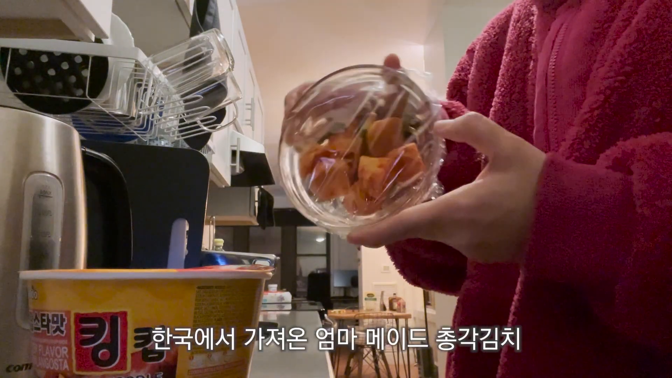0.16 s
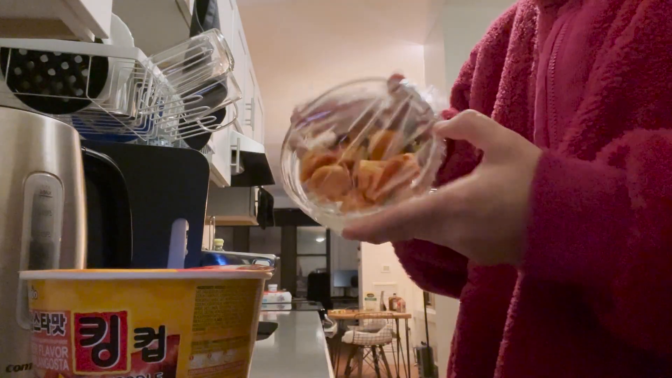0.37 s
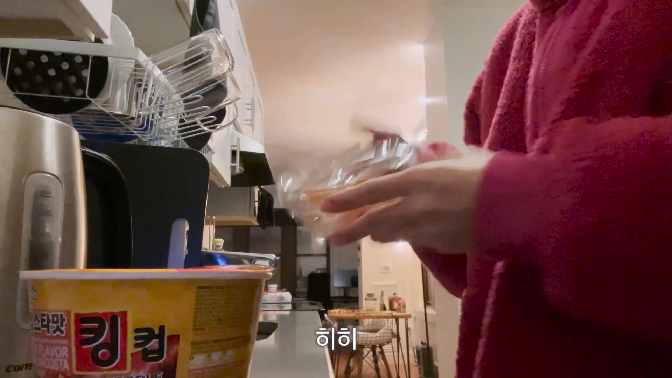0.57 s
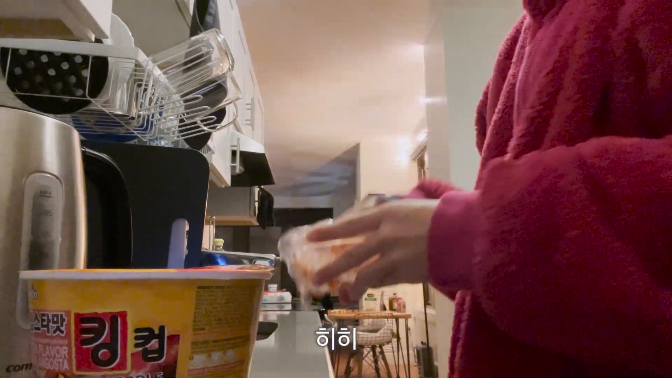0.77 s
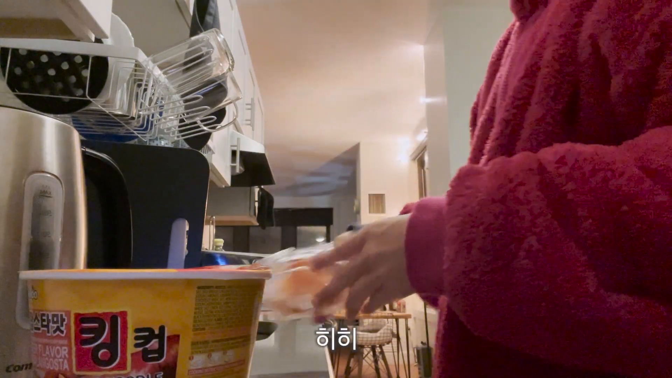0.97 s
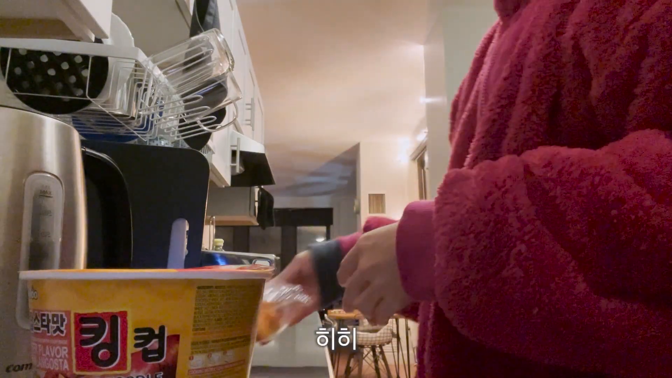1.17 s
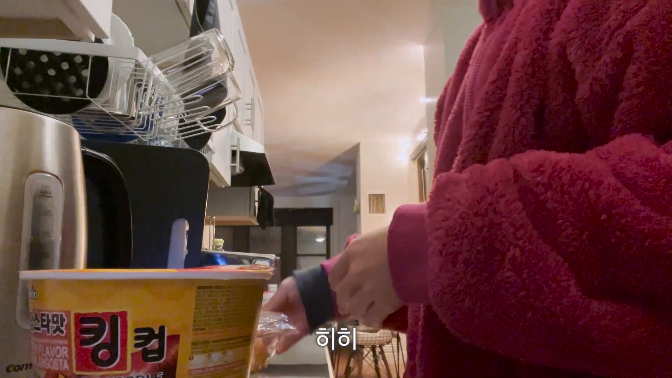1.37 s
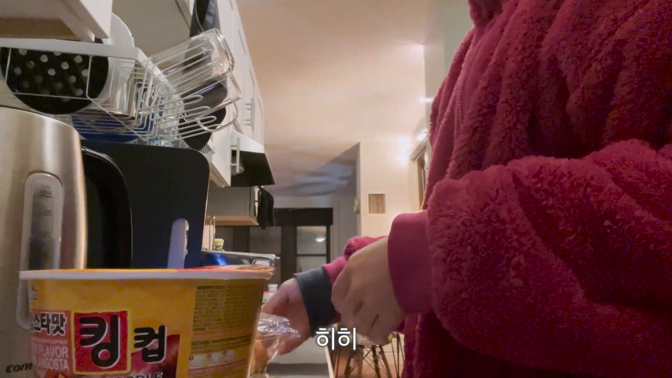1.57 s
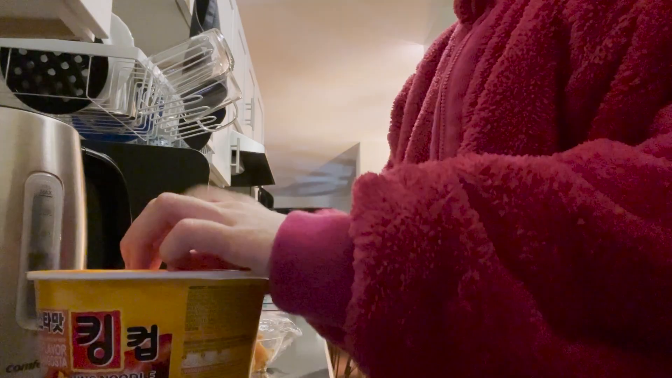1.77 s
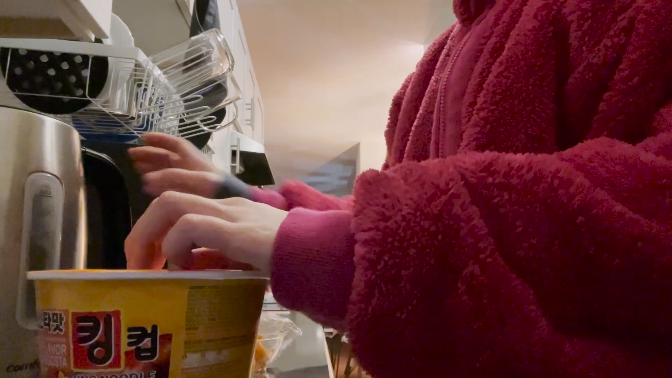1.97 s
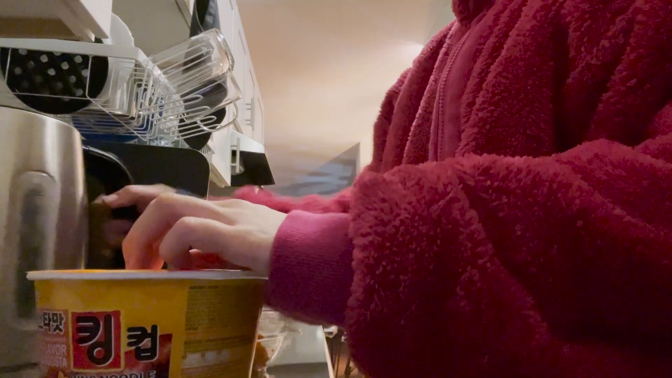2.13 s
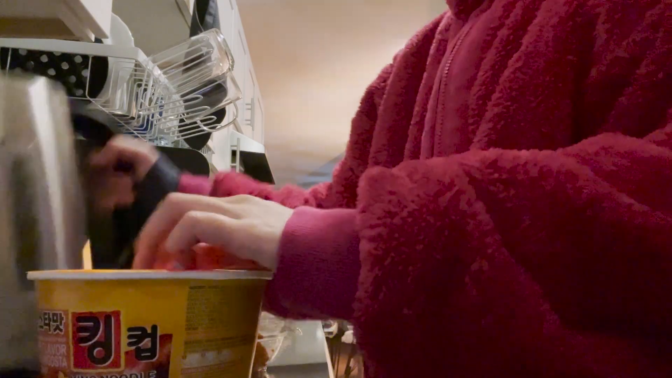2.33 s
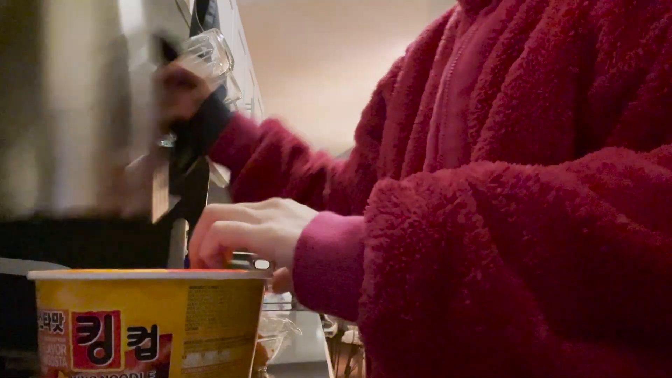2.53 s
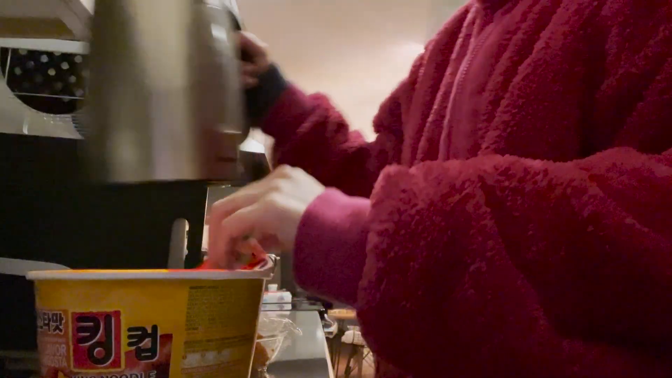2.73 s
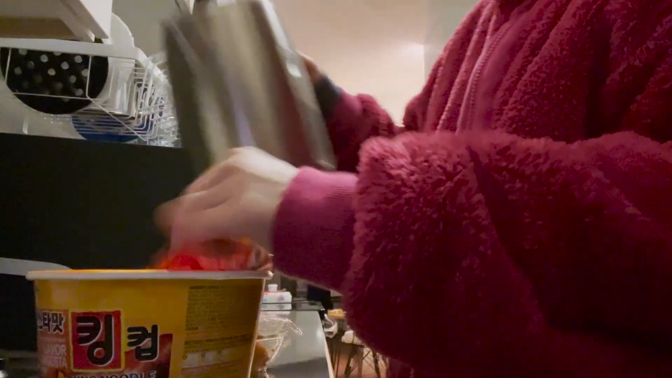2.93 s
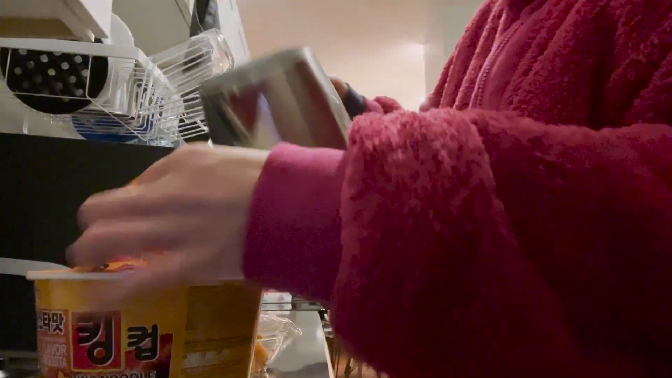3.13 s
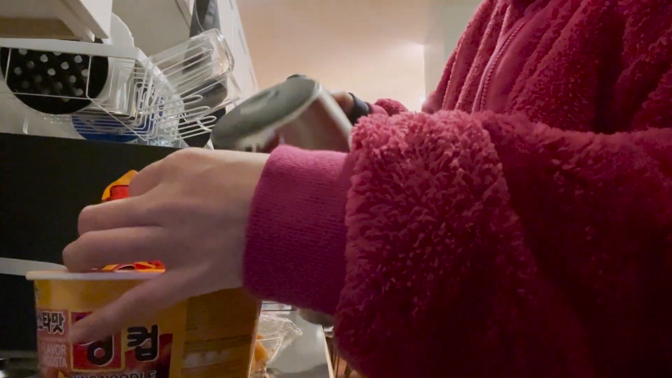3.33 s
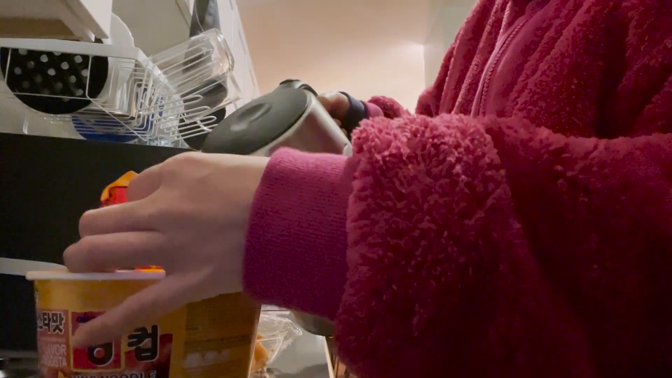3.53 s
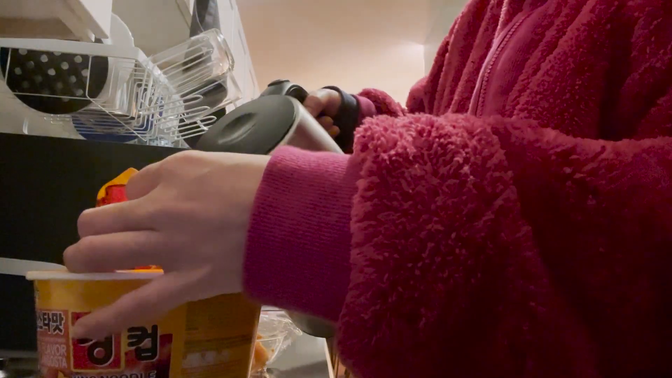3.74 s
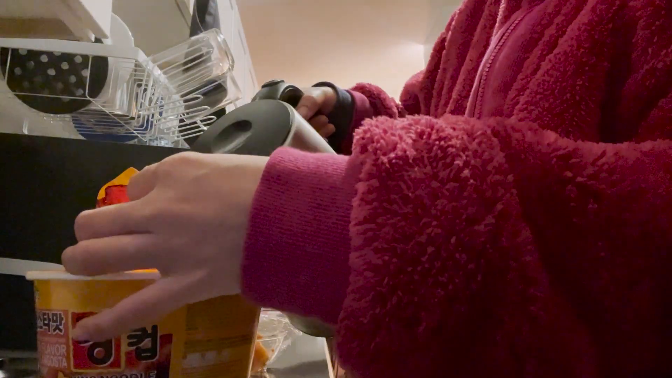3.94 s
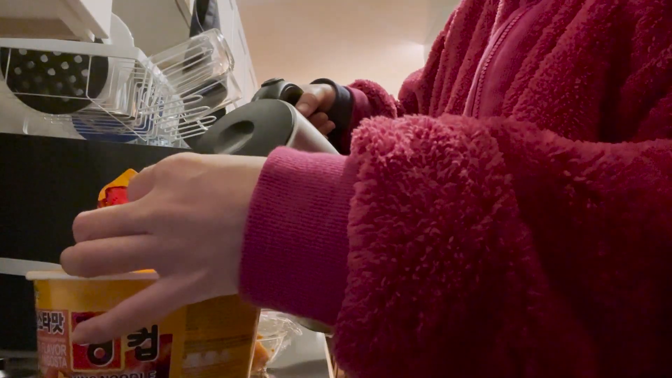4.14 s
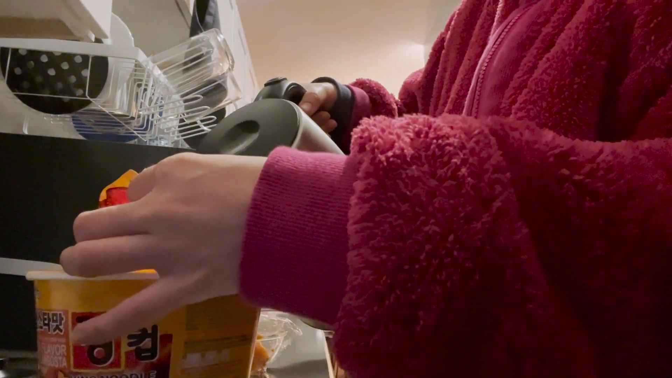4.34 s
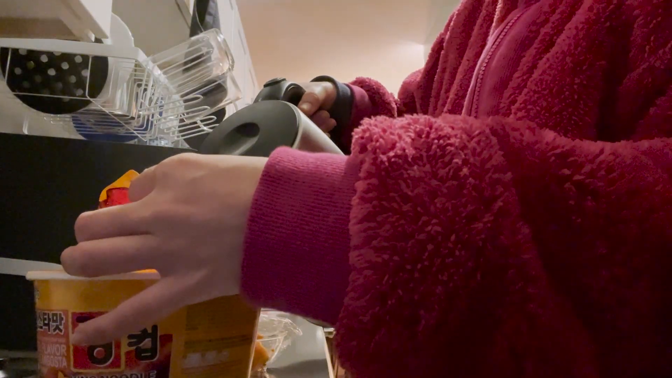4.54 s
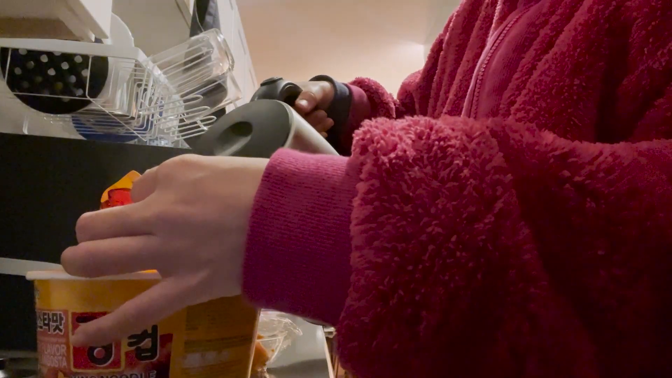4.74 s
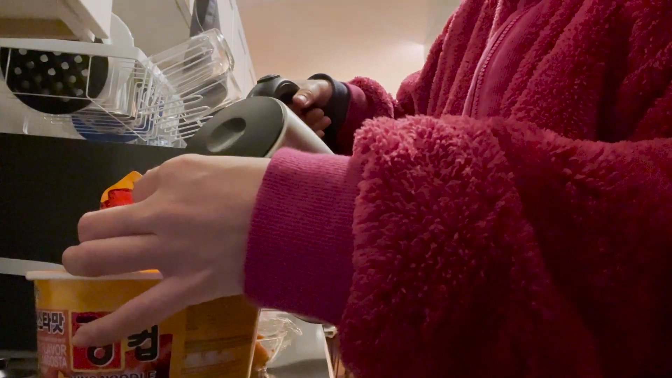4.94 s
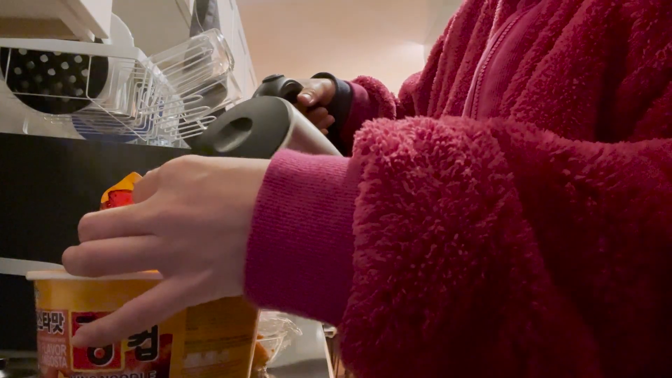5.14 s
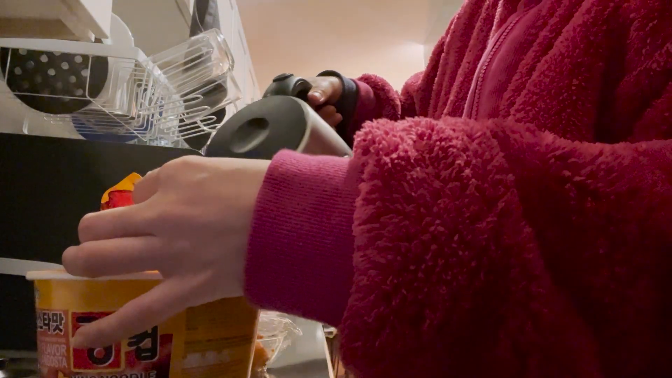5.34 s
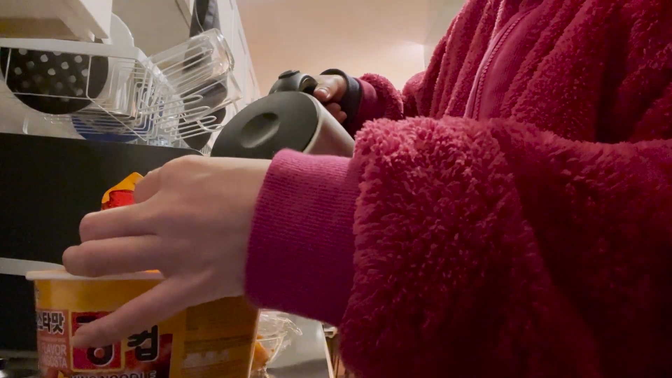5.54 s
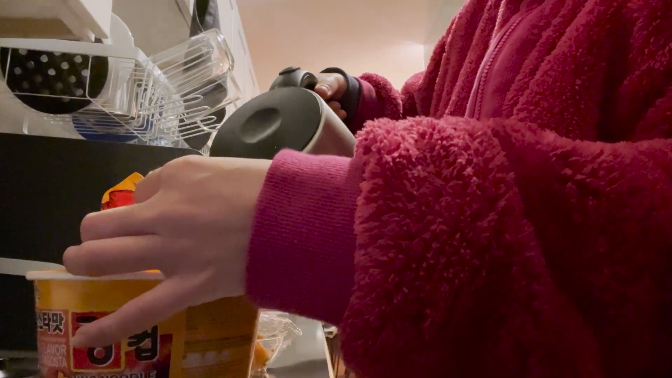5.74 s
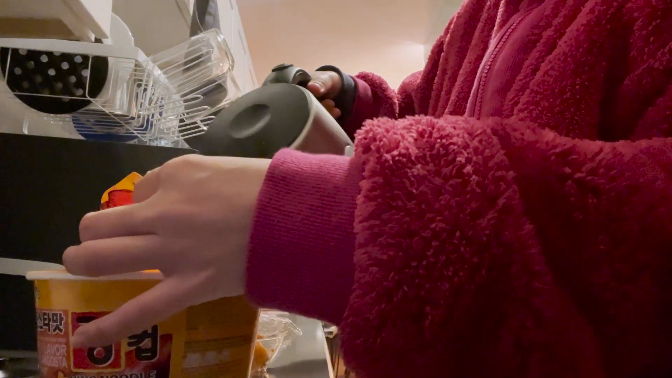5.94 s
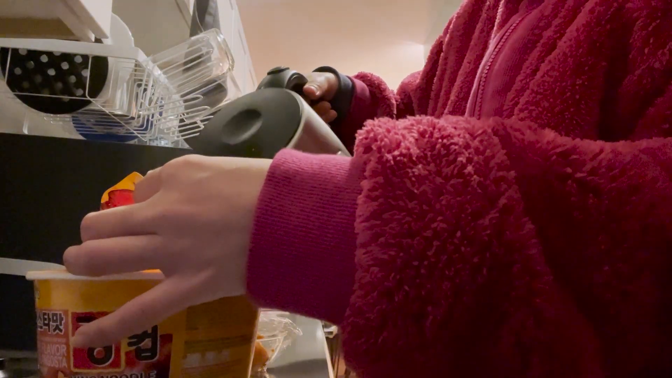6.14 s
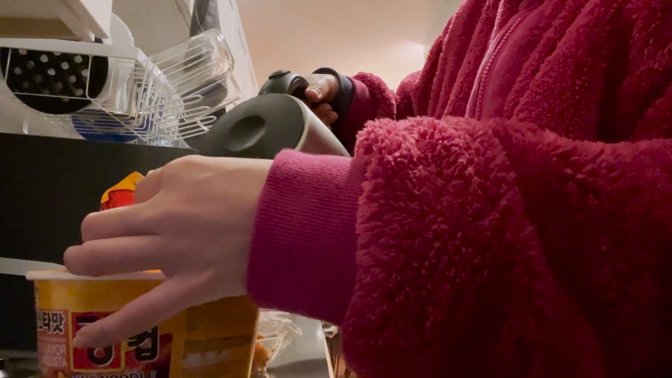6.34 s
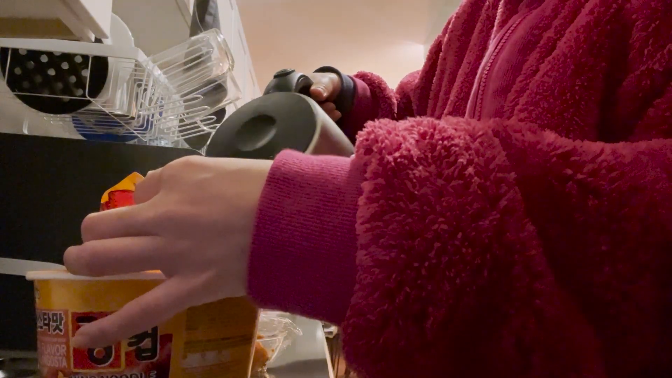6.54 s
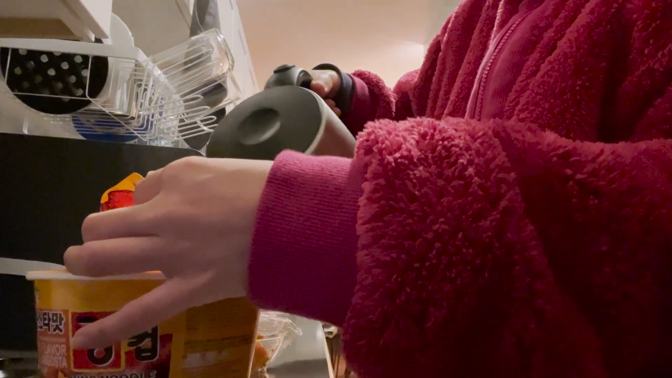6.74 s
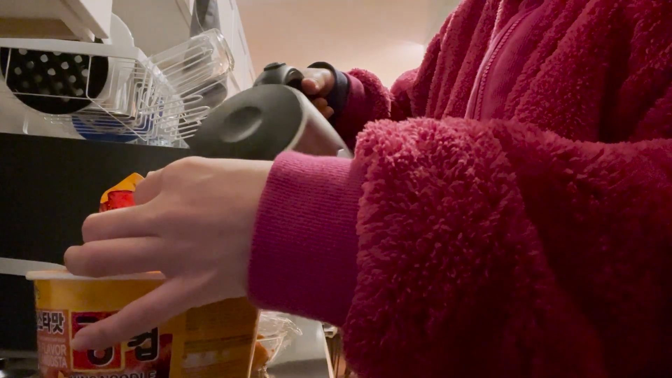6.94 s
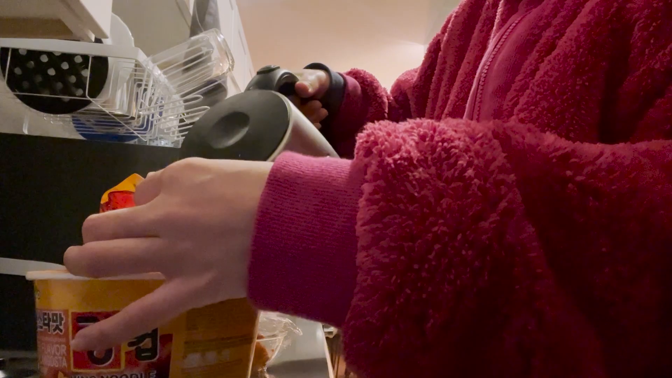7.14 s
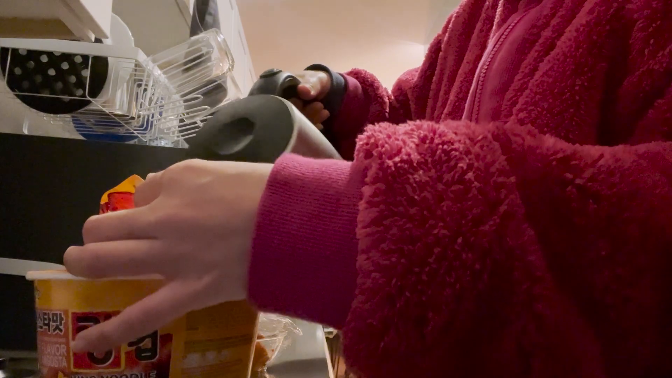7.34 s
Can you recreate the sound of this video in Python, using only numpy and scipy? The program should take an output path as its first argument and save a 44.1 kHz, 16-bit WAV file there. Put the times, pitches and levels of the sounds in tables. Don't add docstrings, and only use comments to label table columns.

```python
import sys
import numpy as np
from scipy import signal
from scipy.fft import rfft, irfft
from scipy.io import wavfile
from scipy.ndimage import uniform_filter1d

SR = 44100
rng = np.random.default_rng(int(sys.argv[2]) if len(sys.argv) > 2 else 0)


def generate_wav(sig):
    pcm = np.round(np.clip(np.atleast_2d(sig).T, -1, 1) * 32767).astype(np.int16)
    wavfile.write(sys.argv[1], SR, pcm)


def ratio(d):
    e = np.asarray(d, float) / 20
    return 10 ** e


N = 326320
T = np.arange(N) / SR

# (f/Hz, level/dB)
CRACK_SPECTRUM = [(300, -6.5), (700, 6.5), (1100, 5.5), (1800, 5), (2600, -0.5), (3300, -11), (7000, -36),
                  (16000, -51)]


def evened(x):
    return x / np.sqrt(np.mean(x ** 2) + 1e-20)


def read(points, hz):
    f, *columns = np.transpose(points)
    return [np.interp(np.log(hz + 1), np.log(f + 1), column) for column in columns]


def played(rows):
    s, *columns = np.transpose(rows)
    return [np.interp(T, s, column) for column in columns]


def ramp(s, takes):
    return np.clip((T - s) / takes, 0, 1)


def add(mix, s, sound):
    part = mix[round(s * SR):][:len(sound)]
    part += sound[:len(part)]


def colour(x, points):
    hz = abs(np.fft.fftfreq(8192, 1 / SR))
    log_gain = np.log(ratio(read(points, hz)[0]))
    response = np.exp(np.conj(signal.hilbert(log_gain)))
    return signal.oaconvolve(x, np.fft.ifft(response).real[:4096])[:len(x)]


def ring(x, modes):
    out = 0
    for hz, width, db in modes:
        pole = np.exp((2j * np.pi * hz - 1.5 * np.pi * width) / SR)
        mode = signal.lfilter([(1 - abs(pole)) ** 2], np.poly([pole, pole]), x + 0j).real
        out = out + ratio(db) * mode
    return evened(out)


def struck(modes):
    t = T[:12000]
    return sum(ratio(db - 60 * t / t60) * np.sin(2 * np.pi * hz * t) for hz, db, t60 in modes)


def crack(t60):
    t = T[:6000]
    rattle = ratio(-60 * t / t60) + 0.017 * ratio(-60 * t / (5 * t60))
    rattle = rattle * (1 - np.exp(-t / 0.0018))
    drive = 0.045 * rng.standard_normal(len(t)) * rattle
    drive[[46, 63, 99]] += [.3, -1, .25]
    burst = colour(drive, CRACK_SPECTRUM)
    return burst / abs(burst).max()


def thud(modes, t60):
    t = T[:8000]
    tones = sum(ratio(db) * np.sin(2 * np.pi * hz * t) for hz, db in modes)
    return tones * (1 - np.exp(-(t / 0.0032) ** 2)) * ratio(-60 * t / t60)


def bubbles(per_s, spread_db, swell_db, swell_s):
    when, size = rng.random(N), rng.exponential(1, N)
    sign, surge = rng.standard_normal(N), rng.standard_normal(N)
    span = max(round(swell_s * SR), 2)
    surge = evened(uniform_filter1d(uniform_filter1d(surge, span), span))
    return (when < per_s / SR) * sign * ratio(spread_db * np.minimum(size, 5) + swell_db * surge)


def echoes(x, decays, start):
    taps, at = np.zeros(SR), np.arange(start, SR - 20, 20)
    taps[at + rng.integers(0, 20, len(at))] = rng.choice([-1., 1.], len(at))
    hz, t, z = signal.stft(taps, SR, nperseg=256)
    fade = ratio(-60 * t / read(decays, hz)[0][:, None])
    tail = signal.istft(z * fade, SR, nperseg=256)[1]
    return signal.fftconvolve(x, tail / np.linalg.norm(tail))[:N]


def room(hits):
    # (f/Hz, t60/s)
    kitchen = [(100, .3), (500, 0.45), (1300, .55), (2500, 0.8), (3500, 0.4), (12000, 0.15)]
    blurred = hits * evened(uniform_filter1d(rng.standard_normal(N), size=100))
    return ratio(-23.5) * echoes(blurred, kitchen, start=300)


def hum():
    # (f/Hz, level/dB)
    hum_spectrum = [(25, -36), (50, 4), (65, 1.5), (110, -8.5), (600, -16.5), (2000, -39), (6000, -40),
                    (16000, -51.5)]
    return ratio(-49.5) * evened(colour(rng.standard_normal(N), hum_spectrum))


def whistle():
    # (t/s, f/Hz, level/dB)
    pitch_curve = [(7.08, 13172, -81), (7.106, 13493, -76), (7.138, 13700, -77.5), (7.222, 14174, -73),
                   (7.266, 13622, -84), (7.274, 13497, -77), (7.314, 13680, -73), (7.352, 12674, -80),
                   (7.4, 12634, -82)]
    hz, db = played(pitch_curve)
    waver, flicker = (evened(uniform_filter1d(row, size=500)) for row in rng.standard_normal((2, N)))
    tone = np.sin(2 * np.pi * np.cumsum(hz + 90. * waver) / SR)
    return ramp(pitch_curve[0][0], .02) * ratio(db + 2.5 * flicker) * tone


def rustle():
    # (t/s, half length/s, level/dB, brightness/dB per octave)
    strokes = [(0.0, 0.025, -72, -39), (0.028, 0.0013, -66, 4), (0.071, .002, -63, 4),
               (0.103, 0.0018, -67, 9), (0.205, 0.0036, -73, 3), (0.267, .006, -64, -8),
               (0.343, 0.002, -68, -0.5), (0.365, 0.013, -58, -2), (0.488, .01, -63, -2),
               (0.588, .003, -61, 4), (0.738, 0.0017, -55, -8), (0.567, 0.14, -59, -2.5),
               (0.682, 0.023, -53.5, -2.5), (0.913, 0.045, -50.5, 1.5), (1.198, 0.042, -60.5, -4.5),
               (1.31, .03, -53.5, -2), (1.34, 0.0071, -31, -5), (1.377, 0.012, -40, -11),
               (1.848, 0.028, -61, -5.5), (2.085, 0.054, -55.5, -3.5), (2.25, 0.093, -62.5, -9.5),
               (2.305, 0.0052, -53, -16), (2.314, 0.0032, -57, 3), (2.568, 0.0066, -57.5, -3),
               (2.63, .006, -60, -4), (2.667, 0.0087, -59.5, -4), (2.752, 0.02, -58, -6.5),
               (2.78, 0.023, -54, -2), (2.907, 0.017, -65, -4), (3.11, 0.087, -66, -9),
               (3.73, 0.0046, -62, 1), (3.855, 0.026, -72, -3), (3.985, 0.019, -55, -2.5),
               (4.082, 0.09, -63.5, -2), (5.084, 0.12, -67.5, -5.5), (5.925, 0.014, -64.5, -4.5),
               (6.14, 0.0048, -61.5, -1), (6.23, .003, -64.5, -5.5), (6.59, .004, -67, -4),
               (6.7, 0.0044, -65, -5), (6.85, .004, -65, -7), (7.1, .005, -75, -7), (5.85, .004, -65, -9),
               (6.757, 0.1, -71.5, -4.5)]
    # (f/Hz, level/dB)
    film = [(450, -45), (900, -18), (2000, 1.5), (4000, 3), (6500, 0.5), (8500, 6), (12000, 5.5),
            (16000, 2.5)]
    power = ratio(2 * (-79 + 18 * np.exp(-T / 3.8)))
    tilted = power * -4
    for s, half, db, tilt_db in strokes:
        stroke = ratio(2 * db) * np.exp(-((T - s) / half) ** 2)
        power, tilted = power + stroke, tilted + stroke * tilt_db
    crackle = evened(colour(bubbles(9000., 2.5, 1.5, .008), film))
    hz, t, z = signal.stft(crackle, SR, nperseg=256)
    octaves = np.log2(np.maximum(hz[:, None], 1200) / 8000)
    z = z * ratio(octaves * np.interp(t, T, tilted / power))
    z = z * ratio(-4.5 * (hz[:, None] > 11000) * (t > 1.42))
    return ratio(5) * np.sqrt(power) * signal.istft(z, SR, nperseg=256)[1][:N]


def ticks():
    # (t/s, peak level/dB, centre f/Hz)
    clicks = [(0.111, -45, 2600), (0.799, -36.5, 2600), (0.9156, -45, 7300), (1.276, -40, 2530),
              (1.3315, -40, 2500), (1.381, -34, 2280), (1.8238, -39, 4640), (2.056, -30, 3100),
              (2.162, -40, 2480), (2.222, -34, 2600), (2.2538, -30.5, 2600), (2.302, -22.5, 2280),
              (2.6023, -41, 5000), (2.7412, -31, 1980), (2.9172, -32, 2310), (3.095, -39.5, 2520),
              (3.472, -42, 3780), (3.496, -37, 3800), (3.7224, -51, 3370), (3.838, -39, 2860),
              (3.991, -33, 2620), (5.0474, -51, 2840), (5.1183, -49, 4400), (5.4949, -40, 1480),
              (5.648, -46, 2800), (5.916, -47, 7450), (6.136, -51, 3540), (6.769, -43, 2000),
              (7.3828, -47, 3460)]
    out, t = np.zeros(N), T[:800]
    for (s, db, hz), puff in zip(clicks, rng.standard_normal((len(clicks), 800))):
        puff = evened(colour(puff, [(500, -20), (hz, 0), (9000, -6), (16000, -22)]))
        pitch = 0.28 * np.sin(2 * np.pi * hz * t) * ratio(-60 * t / 0.028)
        add(out, s, ratio(db + 3.5) * (pitch + 0.29 * puff * ratio(-60 * t / 0.015)))
    return out


def sliding_tones():
    # (t/s, peak level/dB, start f/Hz, end f/Hz, length/s)
    slides = [(0.11, -49.5, 2620, 2530, 0.026), (.792, -47.5, 2620, 2600, .025),
              (.974, -49, 2800, 2600, 0.025), (3.5, -43, 580, 630, 0.018), (5.253, -43, 680, 650, 0.016),
              (2.418, -29, 420, 620, .012), (2.671, -38, 820, 850, .014), (2.745, -34, 1000, 1000, 0.022),
              (2.306, -33, 980, 1070, 0.022), (4.682, -50.5, 1500, 1800, 0.022),
              (5.113, -46, 3870, 3350, 0.019), (5.494, -45.5, 2700, 2530, 0.013),
              (3.724, -41.5, 1070, 1120, 0.026), (4.989, -46, 950, 1200, 0.016),
              (5.256, -49, 1070, 920, 0.012), (7.274, -41, 757, 740, 0.057), (4.6, -45, 920, 1200, .015),
              (7.383, -54, 1040, 950, .012), (2.116, -40.5, 1620, 2040, 0.016),
              (3.113, -38, 830, 1100, 0.021)]
    out = np.zeros(N)
    for s, db, from_hz, to_hz, length in slides:
        u = np.linspace(0, 1, round(length * SR))
        tone = np.sin(2 * np.pi * np.cumsum(from_hz + (to_hz - from_hz) * u) / SR)
        add(out, s, ratio(db) * np.sin(np.pi * u ** .5) * tone)
    return out


def bowl():
    # (t/s, crack level/dB, thud level/dB, rattle t60/s)
    landings = [
        (1.3333, 9.5, -4, .035),
        (1.3806, 8, -18, .05),
    ]
    # (f/Hz, level/dB, t60/s)
    glass = [(594, -23.5, .12), (830, -24, .12), (916, -9.5, 0.107), (1030, -11, .12), (1213, 7, .08),
             (1694, -5, 0.046), (1750, -25, 0.091), (2080, -14.5, 0.3), (2200, -35, 0.12), (2550, -32, 0.1),
             (2840, -12, .085), (2990, -13, 0.28), (3400, -22, 0.079), (3900, -2, 0.059)]
    # (f/Hz, level/dB, t60/s)
    rim = [(647, -7, .15), (900, 3.5, 0.076), (1165, -3, .13), (1290, -3, 0.07), (1400, -32, 0.11),
           (1750, -7, 0.062), (2200, -7, .05), (2610, -9, 0.16), (2960, -8, 0.16), (2910, -28, 0.22),
           (3770, -9, .053)]
    out, first_s = np.zeros(N), landings[0][0]
    scrape = colour(rng.standard_normal(800), CRACK_SPECTRUM) * np.linspace(0, 1, 800) ** 1.36
    add(out, first_s - .017, ratio(-8) * scrape)
    add(out, first_s - .0014, ratio(1.5) * crack(.03))
    for s, db in [(1.394, -7.5), (1.405, -11.5)]:
        add(out, s, ratio(db - 10) * struck(rim) * ratio(-T[:12000] * 900))
    for (s, db, thud_db, rattle_t60), modes in zip(landings, [glass, rim]):
        add(out, s - .001, ratio(db) * crack(rattle_t60))
        add(out, s, ratio(db - 21.5) * struck(modes))
        add(out, s - .0004, ratio(thud_db + 14.0) * thud([(205, 3), (330, 1.5), (490, -14.0)], 0.022))
        add(out, s, ratio(thud_db - 2.5) * thud([(95, 1.0), (150, -4.5), (320, -5.5)], 0.078))
    return out


def rubs():
    # (t/s, half length/s, level/dB)
    slips = [(2.06, 0.015, -46), (2.132, 0.026, -42), (2.305, .02, -34), (2.408, 0.021, -44.5),
             (2.52, 0.073, -49.5), (2.6, 0.053, -50.5), (2.673, 0.03, -46.5), (2.75, 0.014, -24.5),
             (2.85, 0.037, -44.5), (2.935, .02, -41)]
    # (f/Hz, width/Hz, level/dB)
    handle = [(618, 200, 1), (800, 183, 1), (986, 490, -7.5), (1700, 590, -15), (2600, 1500, -16.5)]
    level = sum(ratio(db) * np.exp(-((T - s) / half) ** 2) for s, half, db in slips)
    return level * ring(bubbles(2500., 2.5, 1.2, .006), handle)


def knocks():
    # (t/s, click level/dB, click f/Hz, thud level/dB, thud f/Hz)
    contacts = [(2.001, -36, 920, -27, 242), (2.052, -33, 2920, -51, 196), (2.117, -27, 1740, -53, 199),
                (2.138, -40, 1000, -51, 318), (2.178, -53, 1090, -28.5, 286), (2.222, -34, 1710, -56, 269),
                (2.301, -22.5, 1840, -43, 358), (2.304, -14, 930, -19, 366), (2.361, -34, 820, -28.5, 402),
                (2.418, -32.5, 740, -24.5, 581), (2.569, -34.5, 1000, -63, 220),
                (2.633, -42.5, 1070, -32, 274), (2.67, -37.5, 840, -37.5, 200),
                (2.719, -39, 925, -21.5, 370), (2.742, -22, 1750, -12.5, 510),
                (2.748, -23, 1530, -22.5, 294), (2.758, -41, 1750, -28.5, 457),
                (2.779, -49, 905, -22.5, 410), (2.842, -36, 880, -27, 356),
                (2.9168, -19.5, 2000, -31.5, 437), (2.918, -11.5, 990, -49, 300),
                (2.948, -41, 2080, -29.5, 434), (2.979, -41, 2100, -47, 400),
                (3.111, -30.5, 1020, -34, 206), (3.474, -37, 1600, -34, 306), (3.726, -40, 1020, -49, 408)]
    # (f/Hz, level/dB)
    kettle = [(292, 2.5), (355, 1), (492, 2.5)]
    # (f/Hz, level/dB, t60/s)
    latch = [(764, -6, .1), (1012, -3, .08), (1300, -8, .04), (1766, -4, .12), (1950, -7, .14),
             (2121, -12, .2), (2293, -2, .06), (2450, -13, .08), (2606, -12, .1), (2708, -12, .1),
             (4200, -10, .02)]
    out = np.zeros(N)
    for s, db, hz, thud_db, thud_hz in contacts:
        burst = crack(0.044)
        body = ring(burst, [(hz, 0.14 * hz, 0)])
        add(out, s - .001, ratio(db - 0.5) * burst + ratio(db - 7.0) * body / abs(body).max())
        add(out, s, ratio(thud_db + 3.5) * thud(kettle + [(thud_hz, 2.5)], 0.062))
    add(out, 2.918, ratio(-32) * struck(latch))
    return out


def boil():
    # (t/s, vigour/dB)
    vigour = [(0.0, 2.5), (0.12, 2), (0.45, 1.5), (0.75, 3), (1.2, 2), (1.62, 4), (1.92, -1.5), (2.33, 3.5),
              (2.6, -4), (3.06, 1), (3.58, -1.5), (3.72, -11.5), (4.1, -3)]
    # (standing level/dB, change once lifted/dB, change once tipped/dB)
    posture = [
        (-42.5, -7, 8.5),
        (-36, 0, -12),
        (-39, 4, -14),
        (-38, -8.5, 13.5),
    ]
    # (f/Hz, level/dB)
    base = [(30, -25.5), (55, 13), (80, 19), (110, 6), (150, -39), (300, -34.5)]
    # (f/Hz, width/Hz, level/dB)
    low_wall = [(200, 24, -13), (225, 60, 41)]
    # (f/Hz, width/Hz, level/dB)
    mid_wall = [(295, 35.6, 0.018), (358, 40, 0.0048)]
    # (f/Hz, width/Hz, level/dB)
    high_wall = [(404.4, 73.6, 6), (498.4, 47, -7.5), (573, 41, -30), (910, 106, -12.5), (1207, 225, -20.5),
                 (2600, 1740, -28)]
    lifted, tipped = ramp(2.61, 0.8), ramp(3.62, 0.21)
    vigour_db = played(vigour)[0]
    rumble_db, *wall_db = [vigour_db + db + up_db * lifted + tip_db * tipped for db, up_db, tip_db in posture]
    drive = bubbles(1500., 1.56, 0.31, 0.0096)
    wall = sum(ratio(db) * ring(drive, modes) for db, modes in zip(wall_db, [low_wall, mid_wall, high_wall]))
    rumble = ratio(rumble_db) * evened(colour(rng.standard_normal(N), base))
    return (1 - ramp(3.66, 0.53)) * (wall + rumble)


def pour():
    # (t/s, flow/dB)
    flow = [(3.3, -2.5), (3.57, -2), (3.75, -2.5), (4.05, -0.5), (4.13, -6), (4.22, -1), (4.43, -1.5),
            (4.62, -0.5), (4.66, -5), (4.72, -2.5), (5.0, -3), (5.2, -4), (5.3, -5), (5.42, -5.5),
            (5.9, -8), (6.45, -9.5), (7.0, -10), (7.4, -9.5)]
    # (f/Hz, width/Hz, level/dB)
    cup = [(321, 35.3, 0), (384, 76, 1), (530, 69, -3)]
    # (f/Hz, width/Hz, level/dB)
    splash = [(627, 100, 4.5), (650, 84, -9), (767, 51, 5.5), (859, 132, 0), (1090, 51, 3)]
    # (f/Hz, width/Hz, level/dB)
    spray = [(2000, 870, -30.5), (2920, 350, 7), (3470, 450, 6), (3980, 1450, 4.5), (5840, 2100, -9.5)]
    # (f/Hz, width/Hz, level/dB)
    landing = [(1360, 240, -0.75), (1385, 230, -0.75)]
    # (t/s, peak level/dB, pitch f/Hz, slap on the surface level/dB)
    gulps = [(3.249, -32, 288, -46.5), (3.433, -29, 298, -57), (3.558, -25, 292, -53),
             (3.729, -25, 390, -36), (3.857, -30, 372, -62), (3.929, -23, 323, -43), (4.285, -42, 358, -60),
             (4.315, -44, 400, -51), (4.52, -24, 325, -51), (4.763, -29, 320, -44.5),
             (4.927, -27, 384, -38), (4.987, -54, 310, -41), (5.1, -30.5, 381, -54),
             (5.132, -35.5, 306, -41), (5.253, -33, 352, -41), (5.497, -30.5, 354, -41),
             (5.753, -30, 360, -49), (5.914, -47, 312, -56), (6.031, -33, 377, -44),
             (6.173, -34.5, 303, -47), (6.238, -32.5, 358, -43), (6.415, -31, 342, -40.5),
             (6.571, -31.5, 284, -44.5), (6.758, -33, 383, -45), (6.88, -38, 280, -45),
             (6.971, -39, 295, -43), (7.02, -30, 287, -42), (7.279, -34.5, 265, -40.5),
             (7.385, -30.5, 310, -44)]
    flow_db = played(flow)[0]
    drive = bubbles(4000., 2.4, 1.6, 0.012)
    sloshing, flowing = ramp(1.68, 0.41), ramp(3.13, 0.12)
    slosh_db, splash_db = -52.5, -47.5
    out = flowing * ratio(-42.5 + 0.62 * flow_db) * ring(drive, cup)
    out += flowing * ratio(-58 + flow_db) * ring(drive, spray)
    out += sloshing * ratio(slosh_db + flowing * (splash_db + flow_db - slosh_db)) * ring(drive, splash)
    out += flowing * ratio(-56 + 1.92 * flow_db) * ring(drive, landing)
    t = T[:4000]
    slap_modes = splash + [(1960, 3900, -27), (3800, 1100, -43.0)]
    for (s, db, hz, slap_db), spatter in zip(gulps, rng.standard_normal((len(gulps), len(t)))):
        slap = ring(spatter, slap_modes) * ratio(-60 * t / 0.041)
        add(out, s - .001, ratio(slap_db + 4.5) * slap)
        shape = (1 - np.exp(-t / 0.0022)) * ratio(-60 * t / 0.055)
        add(out, s - .003, ratio(db + 1.5) * shape * np.sin(2 * np.pi * hz * (t + 0.85 * t ** 2)))
    return out


def scatter(x):
    turns = np.arange(N) / 1024
    signs = rng.choice([-1., 1.], (N // 1024 + 2, 2))
    out = 0
    for k in range(2):
        turn = turns + k / 2
        window = np.sin(np.pi * turn) * signs[turn.astype(int), k]
        out = out + echoes(x * window, [(100, 0.19), (10000, 0.032)], start=0)
    return out


def scene():
    hits = bowl() + knocks() + ticks() + sliding_tones()
    near = room(hits) + hum() + whistle() + rustle() + hits + rubs() + boil() + pour()
    return np.array([near, scatter(near - 0.31 * hits)])


def roll_off(x):
    return signal.sosfilt(signal.butter(12, 15850, fs=SR, output="sos"), x)


def record(dry):
    # (f/Hz, likeness 0-1)
    likeness = [(60, .998), (300, .97), (700, .74), (1150, .86), (2300, .55), (5500, .42), (6900, .9),
                (15000, .93)]
    # (f/Hz, phase/rad)
    left_lead = [(150, 0), (300, .27), (430, .95), (690, 3.1), (1150, 1.05), (1700, .2), (3500, -1.9),
                 (6900, 0)]
    # (f/Hz, level/dB)
    balance = [(60, -3.5), (150, 3), (300, -3), (500, 1.1), (850, -2.5), (1150, 2.3), (3500, 0),
               (6900, -0.6)]
    # [low f/Hz, high f/Hz]
    band_hz = [42, 15850]
    hz = np.fft.rfftfreq(N, 1 / SR)
    same, lead, balance_db = (read(table, hz)[0] for table in (likeness, left_lead, balance))
    lead = lead + np.clip((hz - 7650) / 1000 * .95, 0, 2 * np.pi)
    same = np.clip(same, 0, 1)
    near, scattered = rfft(dry)
    far = (same * near + np.sqrt(1 - same ** 2) * scattered) * np.exp(-1j * lead)
    pair = irfft([near * ratio(balance_db / 2), far * ratio(-balance_db / 2)], N)
    pair = signal.sosfilt(signal.butter(2, band_hz[0], "high", fs=SR, output="sos"), pair)
    pair = signal.oaconvolve(pair, signal.firwin(511, band_hz[1], fs=SR)[None], "same")
    power_db = 10 * np.log10(abs(uniform_filter1d((pair ** 2).mean(0), 300)) + 1e-12)
    fall = T * 52.0
    over_db = np.maximum(np.maximum.accumulate(power_db + fall) - fall + 18, 0)
    ducked = pair / ratio(0.61 * uniform_filter1d(over_db, 400, origin=150))
    return roll_off(1.094 * np.tanh(ducked / 0.96))


dry = scene()
out = record(dry)
generate_wav(out)
```